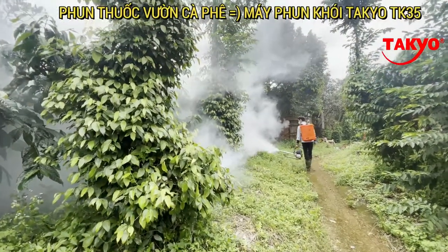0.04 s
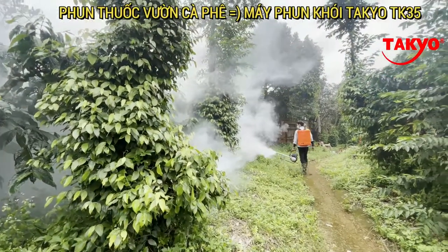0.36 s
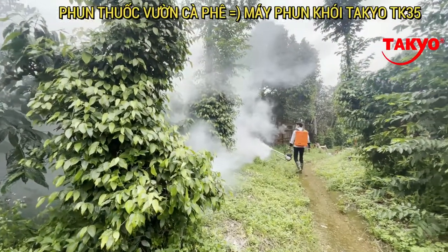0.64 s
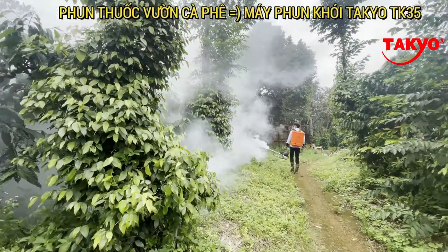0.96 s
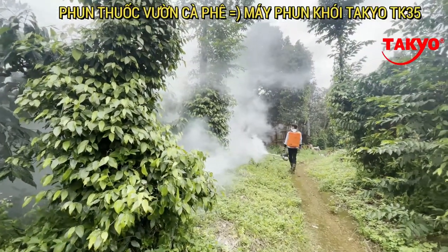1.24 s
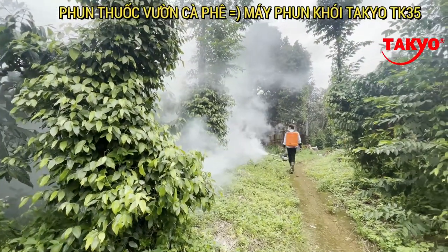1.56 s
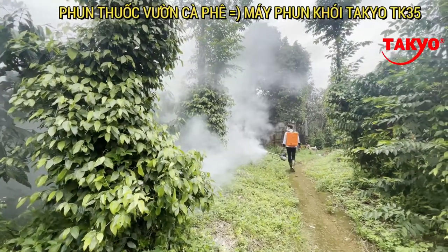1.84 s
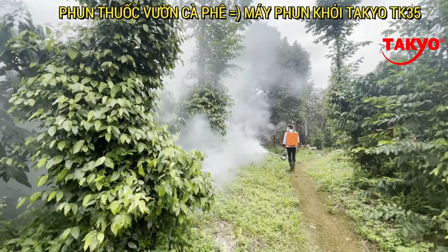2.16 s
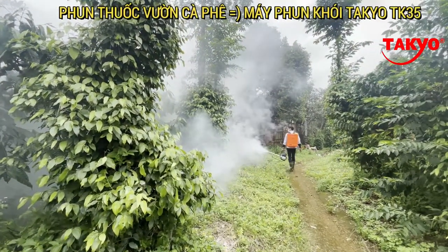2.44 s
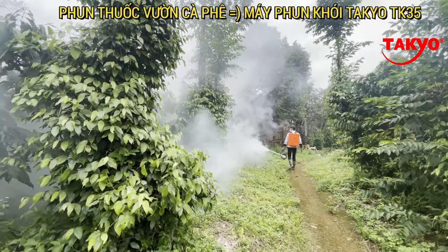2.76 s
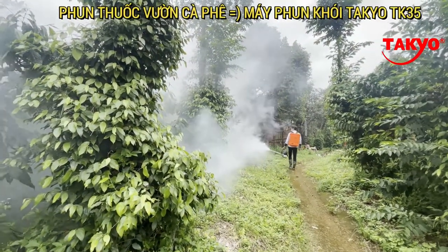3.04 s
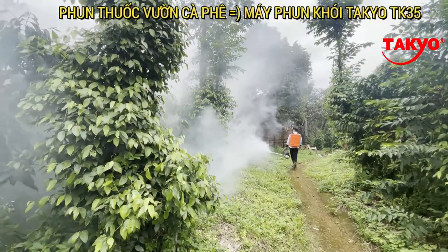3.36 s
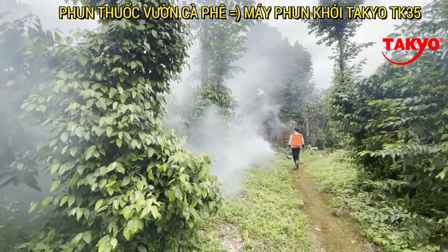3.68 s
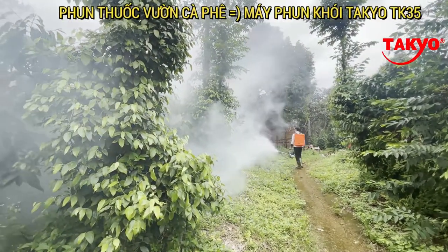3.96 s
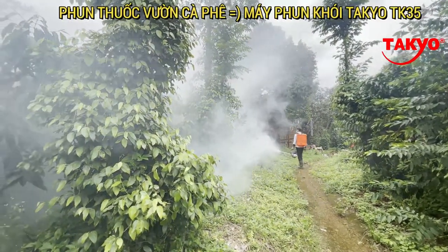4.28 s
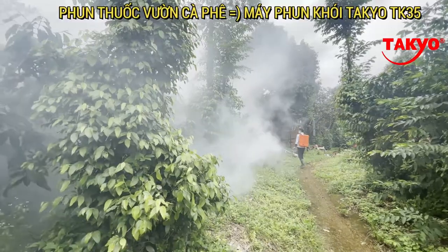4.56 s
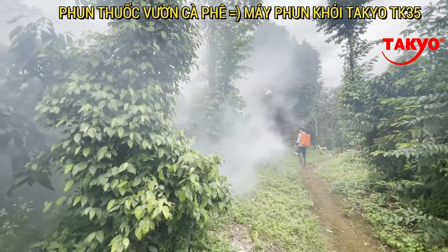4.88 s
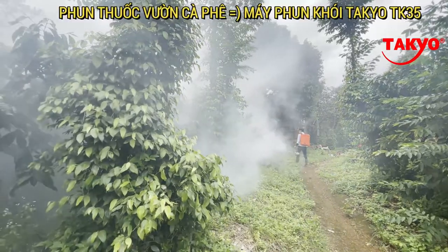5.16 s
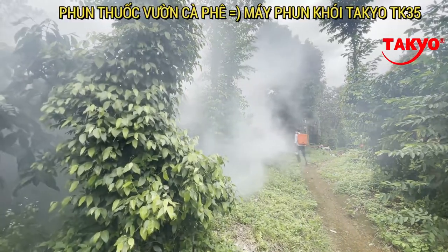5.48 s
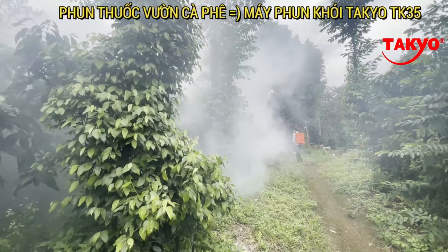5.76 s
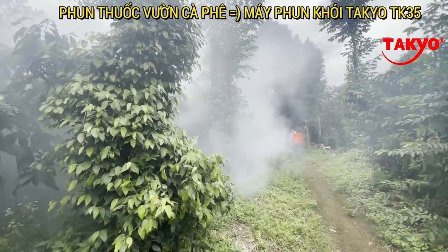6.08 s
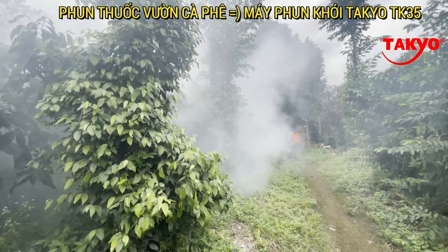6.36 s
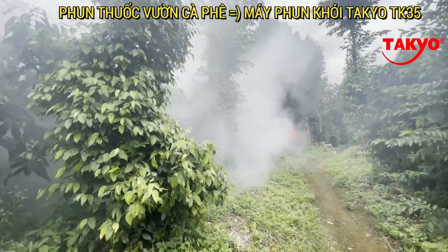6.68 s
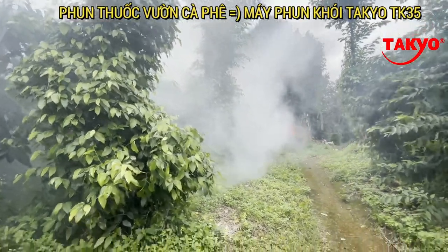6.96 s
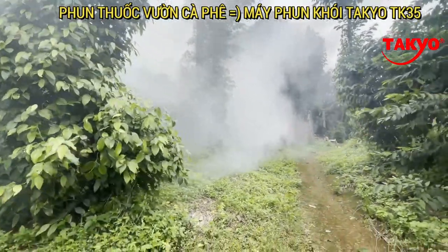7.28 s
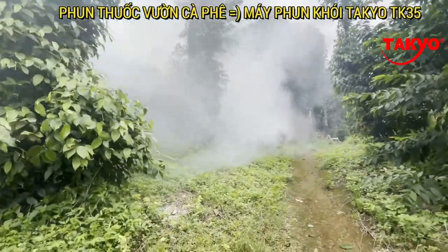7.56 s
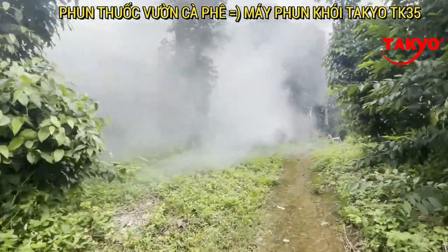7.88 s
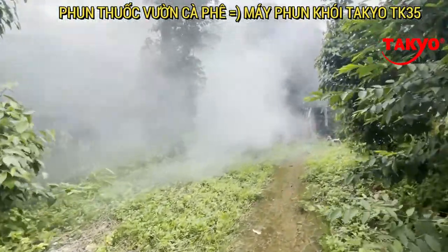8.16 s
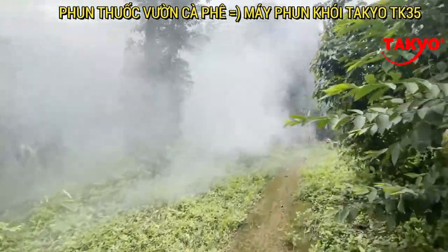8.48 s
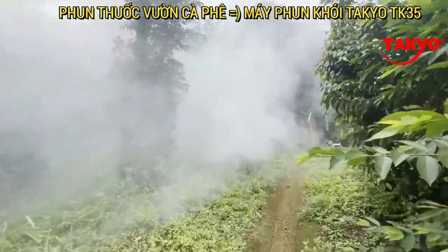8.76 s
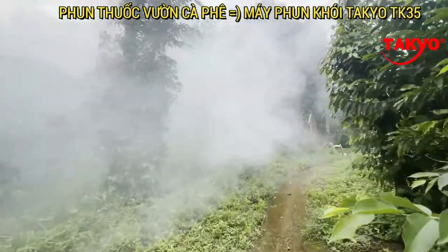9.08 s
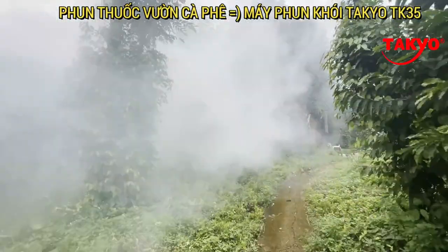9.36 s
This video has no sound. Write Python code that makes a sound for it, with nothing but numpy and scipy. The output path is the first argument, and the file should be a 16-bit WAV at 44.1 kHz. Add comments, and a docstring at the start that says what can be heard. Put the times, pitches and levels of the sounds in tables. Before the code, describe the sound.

The rapid, rasping buzz of a petrol fogger runs over its hissing smoke jet in a garden; soft steps on grass come near the end.

```python
"""The rasping drone of a backpack petrol fogger, about 80 firings a second, carried down a garden path.
Each firing gives a low hum, a sharp crack ringing in the exhaust tube and a puff of gas, over the hiss
of the smoke jet and the whistle of its nozzle. Leaves scatter and shade the sound, the ground echoes it.
Late on, the listener takes a few soft steps past a vine-covered tree; faint outdoor air lies beneath."""
import sys
import numpy as np
from scipy import signal
from scipy.fft import rfft, irfft, next_fast_len
from scipy.io import wavfile
from scipy.ndimage import uniform_filter1d, map_coordinates

SR = 44100
rng = np.random.default_rng(int(sys.argv[2]) if len(sys.argv) > 2 else 0)


def pcm_store(signal):
    """Save signal as 16-bit PCM."""
    levels = np.round(np.clip(np.atleast_2d(signal), -1, 1) * 32767)
    wavfile.write(sys.argv[1], SR, levels.astype(np.int16).T)


N = 424683

# resonances of the silencer and heat shield: pitch_hz, width_hz, lift_db
TUBE = [(1604, 360, 8), (2047, 70, 8.5), (3276, 390, -3), (3710, 290, 3), (4370, 130, 1), (5600, 120, -7),
        (5750, 150, 6.5)]


def firing_turns(strides_per_s=.967, first_stride_s=.357, sway_hz=.39, hunt_hz=.14):
    """Running count of firings: each stride rocks the engine's rate, and it hunts a little at random."""
    # engine speed before sway and hunting: time_s, rate_hz
    speed = [(0.0, 80.39), (0.27, 79.48), (0.44, 80.82), (1.08, 80.58), (1.16, 79.92), (1.79, 80.65),
             (1.95, 81.96), (2.07, 80.75), (3.05, 80.28), (3.2, 79.75), (3.33, 80.45), (3.5, 79.85),
             (4.84, 79.96), (4.94, 79.46), (5.12, 80.18), (5.9, 80.75), (5.99, 79.7), (6.09, 80.8),
             (6.38, 81.0), (6.49, 80.18), (6.94, 79.48), (7.2, 81.63), (7.28, 80.07), (7.36, 80.95),
             (7.66, 80.22), (8.25, 81.22), (8.36, 79.82), (9.39, 80.83), (9.63, 79.67)]
    sway = np.cos(2 * np.pi * strides_per_s * (np.arange(N) / SR - first_stride_s))
    return np.cumsum(curve(speed) + sway_hz * sway + hunt_hz * drift(per_s=8)) / SR


def exhaust(turns, force_spread_db=.5, puff_db=-15, puff_uneven_db=3.0, puff_decay_turns=0.13):
    """Each firing, a little different in force, sends a crack and a puff of gas down the tube."""
    # tone of one crack: freq_hz, gain_db
    crack_tone = [(200, -67), (270, 6), (320, 4), (400, 1), (480, 6), (565, 5), (640, 6.5), (720, 6),
                  (860, -4), (1050, 3), (1300, 2), (1800, -7.5), (2600, -10), (3800, -10), (4700, -13.5),
                  (7000, -22), (12000, -47)]
    # tone of the gas puff behind it: freq_hz, gain_db
    puff_tone = [(200, -39), (400, -9), (900, -4), (1500, -1.5), (2500, -5.5), (4500, 6.5), (7000, -9),
                 (9000, -15), (13000, -36.5)]
    # firings that hit harder: time_s, extra_db
    hard_firings = [(4.92, 4.4), (5.47, 5.8)]
    cycle = turns.astype(int)
    force, gust = np.clip(rng.standard_normal((cycle[-1] + 1, 2)), -2, 2).T
    onsets = np.interp(np.arange(1, cycle[-1] + 1), turns, np.arange(N))
    taps = onsets.astype(int)[:, None] + np.arange(-8, 9)
    cracks = np.zeros(N)
    np.add.at(cracks, np.clip(taps, 0, N - 1), np.sinc(taps - onsets[:, None]))  # clicks between samples
    force_db = force_spread_db * force
    for time_s, extra_db in hard_firings:
        force_db[round(turns[round(time_s * SR)])] += extra_db
    # the low bark repeats evenly; only the sharp front varies from firing to firing
    nearest_firing = np.minimum(np.round(turns).astype(int), cycle[-1])
    varying = cracks * (amp(force_db) - 1)[nearest_firing]
    cracks = cracks + signal.lfilter(*signal.butter(1, 1200, "highpass", fs=SR), varying)
    puff_envelope = amp(puff_uneven_db * gust)[cycle] * np.exp(-(turns % 1) / puff_decay_turns)
    puffs = rng.standard_normal(N) * puff_envelope
    gas = unit(coloured(cracks, crack_tone, TUBE)) + amp(puff_db) * unit(coloured(puffs, puff_tone, TUBE))
    return smoke_tube(silencer(gas), feedback=0.29)


def silencer(x):
    """Each chamber holds back sound near its resonance, drawing the crack out into a short ring."""
    # silencer chambers: pitch_hz, width_hz
    chambers = [(520, 92), (1550, 1130), (2300, 480), (3800, 390)]
    for pitch_hz, width_hz in chambers:
        radius = np.exp(-np.pi * width_hz / SR)
        poles = [1, -2 * radius * np.cos(2 * np.pi * pitch_hz / SR), radius * radius]
        x = signal.lfilter(poles[::-1], poles, x)  # all-pass
    return x


def smoke_tube(x, feedback, round_trip_ms=1.315, loss_hz=7000):
    """Sound runs to and fro in the smoke tube, losing treble on each trip."""
    def trip(hz):
        return feedback * np.exp(-(hz / loss_hz) ** 2 - 2j * np.pi * hz * round_trip_ms / 1000)
    return filtered(x, lambda hz: 1 / (1 - trip(hz)))


def metal_rings(x, q=20):
    """Single rings of the metal swell or duck smoothly as the machine swings."""
    # bell-shaped swells and dips: peak_s, half_width_s, pitch_hz, lift_db
    swells = [(1.0, 0.39, 810, 8), (1.5, 0.4, 3760, 6.5), (1.68, 0.12, 2000, 6), (2.16, 0.19, 2040, 7),
              (2.93, 0.071, 2100, -6), (3.5, 0.18, 2060, 5), (3.5, 0.22, 3680, 1), (4.1, 0.5, 5250, 7),
              (4.273, 0.15, 2110, 8.5), (4.7, 0.12, 2080, -10), (4.8, 0.29, 4520, 7),
              (4.78, 0.18, 3800, -11), (4.9, 1.1, 7400, 5), (5.35, 0.15, 3850, 5), (5.45, 0.29, 2090, 6),
              (6.25, 0.18, 4420, 7), (6.5, 0.55, 970, 9), (6.755, 0.087, 4480, 6), (7.748, 0.54, 2910, 5),
              (7.852, 0.22, 805, 13), (3.8, .3, 950, 8), (7.9, .5, 7400, -4), (8.167, 0.14, 2000, 6),
              (8.7, 1.2, 6500, 1), (8.75, .12, 2100, -10), (8.75, .25, 1680, 11), (9.25, 0.47, 2130, 6)]
    t = np.arange(N) / SR
    for peak_s, half_width_s, pitch_hz, lift_db in swells:
        gain = amp(lift_db * np.exp(-((t - peak_s) / half_width_s) ** 2))
        x = x + (gain - 1) * resonance(x, pitch_hz, pitch_hz / q)
    return x


def hum(turns, lag_turns=0.067, tremble_db=0.38):
    """The exhaust's three lowest harmonics, trembling slightly; the third swings against the other two."""
    # harmonic levels: time_s, first_db, second_db, third_db
    levels = [(0.08, -54, -57, -45), (0.87, -53.5, -54.5, -48), (1.71, -50.5, -50.5, -46.5),
              (2.45, -52.5, -57.5, -45.5), (3.69, -50.5, -52, -43), (4.61, -50.5, -52, -46.5),
              (5.57, -50, -50, -45), (6.07, -52.5, -52, -50.5), (6.67, -54, -54, -46),
              (7.36, -54, -55, -49), (7.81, -52, -53, -43), (8.49, -50, -52.5, -47),
              (9.21, -49.5, -50.5, -42), (9.55, -49, -51, -43.5)]
    angle = 2 * np.pi * (turns - lag_turns)
    tone = np.zeros(N)
    for harmonic, polarity in enumerate([-1, -1, 1], 1):
        gain = amp(curve(levels, column=harmonic) + tremble_db * drift(per_s=25))
        tone += polarity * gain * np.cos(harmonic * angle)
    return np.sqrt(2) * tone


def jet(turns, hiss_db=-0.5, sizzle_db=-5, throb=0.1, gust_db=0.85):
    """The smoke jet hisses a little unevenly, surging with every firing."""
    # jet level before the hiss and sizzle trims: time_s, level_db
    levels = [(0, -53), (3, -52.5), (5, -52.5), (7, -53.5), (8.2, -52), (9.63, -50.5)]
    # body of the hiss: freq_hz, gain_db
    hiss_tone = [(100, -8), (800, -6), (2000, 1), (4000, 2.5), (5600, -9), (7200, -1.5), (8300, -5.5),
                 (9500, -2), (12000, -68), (13000, -61)]
    # its thin, sizzling top: freq_hz, gain_db
    sizzle_tone = [(6000, -40), (8300, -11), (9300, -5), (10300, 9.5), (11300, 9.5), (12000, 2),
                   (12500, -3.5), (13000, -15)]
    surge = 1 + throb * np.cos(2 * np.pi * (turns - .2))
    flow = amp(curve(levels) + gust_db * drift(per_s=10)) * surge
    hiss = smoke_tube(coloured(rng.standard_normal(N) * flow, hiss_tone, TUBE), feedback=0.091)
    hiss = unit(metal_rings(ground_echo(garden_echoes(hiss), depth=0.3)))
    sizzle = unit(coloured(rng.standard_normal(N) * flow, sizzle_tone))
    return flow.mean() * (amp(hiss_db) * hiss + amp(sizzle_db) * from_the_right(sizzle))


def whistle(pitch_hz=5710, stage_width_hz=1380, spread=0.7):
    """Gas rushing through the nozzle sings in one high, broad, smooth band."""
    # nozzle whistle: time_s, level_db
    levels = [(0, -58.5), (1.7, -59), (3, -61.5), (6.3, -60), (7.35, -57), (8, -57), (9.63, -57.5)]
    rush = rng.standard_normal((3, N))  # shared, left, right
    for _ in range(2):
        rush = resonance(rush, pitch_hz, stage_width_hz)
    return amp(curve(levels)) * unit(from_the_right(rush[0]) + spread * rush[1:])


def plant_shade(x, thud_db=-59, thud_follow=0.24, edge_lift_db=1.09, flutter_db=1.5):
    """Plants let each band of the cracks through by a changing amount; the drone and notes flutter."""
    # crossovers between thud, bark, drone, low note, note, middle, ring and edge: freq_hz
    splits = [445, 520, 600, 680, 770, 1390, 1850]
    # low bark near 480 Hz: time_s, level_db
    bark = [(0.0, -75), (1.85, -57.5), (2.73, -86), (2.84, -63.5), (4.58, -59), (4.77, -72), (5.36, -64),
            (5.6, -73), (6.36, -63), (7.35, -70.5), (7.72, -60), (8.58, -71), (8.72, -84), (9.63, -64)]
    # drone near 560 Hz: time_s, level_db
    drone = [(0.0, -56.5), (1.55, -60.5), (1.69, -65.5), (2.22, -54), (3.35, -57), (4.48, -74), (5.71, -59),
             (6.01, -75), (6.3, -63.5), (6.6, -87), (7.08, -67), (7.94, -54.5), (8.02, -62), (8.85, -61.5),
             (9.06, -75), (9.28, -69), (9.44, -83), (9.63, -76)]
    # the tube's low note near 640 Hz: time_s, level_db
    low_note = [(0.0, -88), (0.48, -84), (0.77, -64), (0.94, -76), (1.29, -60), (1.74, -55.5), (2.33, -74),
                (2.63, -69), (2.79, -84), (2.87, -61), (3.08, -59), (3.35, -67), (3.7, -62), (3.86, -73),
                (4.08, -56), (4.37, -54.5), (4.64, -74), (4.69, -62), (5.71, -59), (6.01, -72), (7.45, -54),
                (7.83, -79), (7.89, -77), (8.05, -51.5), (9.41, -69), (9.63, -56)]
    # the tube's note near 720 Hz: time_s, level_db
    note = [(0, -52), (0.67, -64), (0.96, -62), (1.26, -78), (1.36, -73), (1.55, -63), (2.0, -62),
            (2.25, -57), (2.41, -76), (2.6, -52.5), (2.95, -56), (3.22, -71), (3.45, -60), (3.95, -53),
            (4.1, -65), (4.48, -62), (4.69, -53), (4.98, -73), (5.15, -54), (5.44, -55.5), (5.6, -84),
            (5.77, -57), (6.05, -60.5), (6.4, -55), (6.6, -71), (6.75, -65), (7.1, -61), (7.35, -52),
            (7.72, -47), (8.02, -62), (8.12, -53), (8.6, -54), (8.78, -76), (8.93, -58), (9.17, -54.5),
            (9.28, -68), (9.35, -54.5), (9.63, -60)]
    # midrange body: time_s, level_db
    middle = [(0.0, -55.5), (0.54, -57), (0.72, -55), (4.48, -59), (4.75, -54.5), (5.15, -60), (5.85, -57),
              (6.41, -63), (6.6, -56.5), (6.95, -66.5), (7.59, -62), (7.72, -57), (8.18, -57), (9.63, -56)]
    # nasal ring: time_s, level_db
    ring = [(0.0, -53.5), (0.4, -57), (1.69, -53), (4.99, -51), (5.52, -54), (6.41, -49.5), (7.0, -53),
            (7.78, -60), (7.89, -55.5), (8.66, -54), (8.72, -51.5), (9.2, -56), (9.5, -54.5), (9.63, -54)]
    # sharp upper edge, before its lift: time_s, level_db
    edge = [(0.08, -53.5), (0.39, -56), (1.55, -53), (1.66, -51), (2.45, -55), (4.41, -51), (4.56, -53.5),
            (6.94, -53), (7.33, -50.5), (9.55, -53.5)]
    lowpassed = [filtered(x, lambda hz: 1 / (1 + (hz / split) ** 40)) for split in splits]
    bands = np.diff([0 * x, *lowpassed, x], axis=0)
    drone_db = curve(drone)
    flutter = [flutter_db * drift(per_s=22) for _ in range(3)]
    levels = [thud_db + thud_follow * (drone_db - drone_db.mean()),
              curve(bark),
              drone_db + .5 * flutter[0],
              curve(low_note) + .5 * flutter[1],
              curve(note) + flutter[2],
              curve(middle), curve(ring), curve(edge) + edge_lift_db]
    shaded = np.zeros((2, N))
    for band, level_db in zip(bands, levels):
        # even out each band, then ride its level; the two sides never cancel completely
        power = .8 * band.mean(0) ** 2 + .2 * (band ** 2).mean(0)
        envelope = np.sqrt(uniform_filter1d(power, size=SR // 6) + 1e-12)
        shaded += band / envelope * amp(level_db)
    return shaded


def garden_echoes(x, t60_s=0.54, near_db=10, near_decay_s=0.012):
    """Direct sound plus echoes off near leaves and farther trunks, shifting as the carrier walks."""
    # leaf scatter relative to the direct sound: freq_hz, gain_db
    scatter = [(100, -36), (300, -8), (600, -3.5), (1000, 6), (1500, -5), (2500, 4), (4000, -1.5),
               (6000, 5.5), (9000, 1)]
    t = np.arange(SR // 4) / SR
    decay = amp(-60 * t / t60_s) + amp(near_db) * np.exp(-t / near_decay_s)
    crossfades = np.array([drift(per_s=1.7) for _ in range(4)])  # four echo patterns
    crossfades /= np.linalg.norm(crossfades, axis=0)
    echoes = np.zeros((2, N))
    for fade in crossfades:
        tail = rng.standard_normal((2, len(t))) * decay
        tail /= np.linalg.norm(tail, axis=1, keepdims=True)
        echoes += fade * signal.oaconvolve(x[None], tail, axes=1)[:, :N]
    return from_the_right(x) + filtered(echoes, lambda hz: amp(read(scatter, hz)))


def ground_echo(x, grass_hz=4600, depth=1):
    """A grass-dulled bounce carves a comb that sweeps with path height; shallower for a wide source."""
    # ground bounce, sooner as the listener passes the tree: time_s, delay_ms, strength (0-1)
    bounce = [(0, 0.66, 0.1), (3.3, 0.57, 0.32), (4.3, 0.61, 0.35), (5.3, 0.58, 0.45), (6.2, 0.56, 0.5),
              (6.85, 0.51, 0.45), (7.3, 0.41, 0.72), (7.8, 0.37, 0.72), (8.02, 0.4, 0.68),
              (8.25, 0.48, 0.68), (8.5, 0.56, 0.55), (8.9, 0.65, 0.1), (9.63, 0.6, 0.1)]
    positions = np.arange(N) - curve(bounce) * SR / 1000
    dull = filtered(x, lambda hz: 1 / (1 + (hz / grass_hz) ** 4))
    echo = np.array([map_coordinates(side, [positions], order=3) for side in dull])
    return x + depth * curve(bounce, column=2) * echo


def from_the_right(x):
    """Sound from just right of centre reaches the left microphone a little later."""
    # left phase against right, bent by the case between the two ports: freq_hz, lead_rad
    port_phase = [(80, -0.13), (250, -0.25), (500, -.6), (1400, -1), (2300, -.4), (3500, -1), (4400, -0.6),
                  (5400, -2.8), (6200, -.4), (7500, .2), (8200, 1.5), (8900, -.4), (10000, -3),
                  (10500, -3.3), (11800, -6.2), (13000, -6.4)]
    left = filtered(x, lambda hz: np.exp(1j * read(port_phase, hz)))
    return np.array([left, x])


def steps():
    """Close, dull footfalls press softly into the grass."""
    # foot presses: peak_s, level_db, half_width_s
    presses = [(6.94, -67, 0.042), (7.7, -52, 0.02), (7.734, -53.5, 0.013), (8.174, -49, 0.021),
               (8.327, -63, 0.12)]
    # tone of a step: freq_hz, gain_db
    step_tone = [(20, -6), (60, -4), (150, -4), (450, 3), (700, 0), (1100, -8), (4000, -27), (12000, -65)]
    t = np.arange(N) / SR
    envelope = sum(amp(level_db) * np.exp(-((t - peak_s) / half_width_s) ** 2)
                   for peak_s, level_db, half_width_s in presses)
    return envelope * unit(coloured(rng.standard_normal(N), step_tone))


def air(mid_db=-68.5, spread=0.82):
    """A faint, low bed of outdoor noise, partly alike on both sides."""
    # tone of the open air: freq_hz, gain_db
    air_tone = [(15, -34), (40, -28), (70, -6), (200, 3.5), (330, -4.5), (800, -11), (3000, -22.5)]
    mid, side = (unit(coloured(rng.standard_normal(N), air_tone)) for _ in range(2))
    return amp(mid_db) * np.array([mid + spread * side, mid - spread * side])


def amp(db):
    """Decibels to gain."""
    return 10 ** (np.asarray(db) / 20)


def unit(x):
    """Scales to rms 1."""
    return x / np.sqrt(np.mean(x ** 2) + 1e-20)


def curve(rows, column=1):
    """One column of a time table, at every sample."""
    rows = np.array(rows)
    return np.interp(np.arange(N) / SR, rows[:, 0], rows[:, column])


def read(points, hz):
    """Reads a spectrum table on a log-frequency axis."""
    freqs, values = np.transpose(points)
    return np.interp(np.log(hz + 1), np.log(freqs), values)


def drift(per_s):
    """Slow random wandering of rms 1, at up to per_s cycles a second."""
    t = np.linspace(0, N / SR, num=2000)
    rates = per_s * np.geomspace(1 / 10, 1, num=16)
    waves = sum(np.sin(2 * np.pi * (rate * t + rng.random())) for rate in rates)
    return np.interp(np.arange(N) / SR, t, unit(waves))


def filtered(x, response):
    """Applies a response given as a function of frequency."""
    size = next_fast_len(N + 8192)
    return irfft(rfft(x, size) * response(np.fft.rfftfreq(size, 1 / SR)), size)[..., :N]


def coloured(x, spectrum, resonances=(), size=4096):
    """A causal EQ: a broad tone curve with ringing peaks and dips."""
    hz = abs(np.fft.fftfreq(size, 1 / SR))
    peaks_db = sum(lift / (1 + (2 * (hz - pitch) / width) ** 2) for pitch, width, lift in resonances)
    log_gain = np.log(amp(read(spectrum, hz) + peaks_db))
    impulse = np.fft.ifft(np.exp(np.conj(signal.hilbert(log_gain)))).real  # minimum phase
    return signal.oaconvolve(x, impulse[:size // 2])[:N]


def resonance(x, centre_hz, width_hz):
    """The part of a sound that one resonance picks up."""
    return signal.lfilter(*signal.iirpeak(centre_hz, centre_hz / width_hz, fs=SR), x)


def scene():
    """The fogger in the garden, with steps and air."""
    # the fogger's stereo balance: freq_hz, left_over_right_db
    balance = [(80, -0.5), (250, -1), (700, -3), (1500, -2.5), (2200, -1), (3000, 2.5), (4400, 1),
               (5500, 7), (7600, 3.5), (9000, -0.5), (11000, 0.5)]
    turns = firing_turns()
    cracks = ground_echo(garden_echoes(exhaust(turns)))
    cracks = plant_shade(metal_rings(cracks))
    fogger = from_the_right(hum(turns)) + cracks + jet(turns) + whistle()
    fogger = filtered(fogger, lambda hz: amp(np.outer([.5, -.5], read(balance, hz))))
    return fogger + steps() + air()


def record(dry, cutoff_hz=12900):
    """A steep low-pass takes off the very top."""
    lowpass = signal.firwin(511, cutoff_hz, window=("kaiser", 9), fs=SR)
    return signal.oaconvolve(dry, lowpass[None], "same")


dry = scene()
out = record(dry)
pcm_store(out)
```